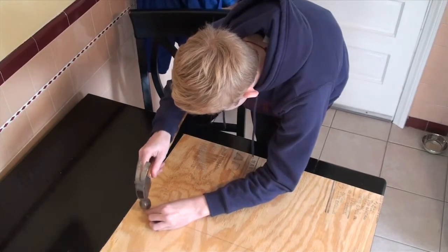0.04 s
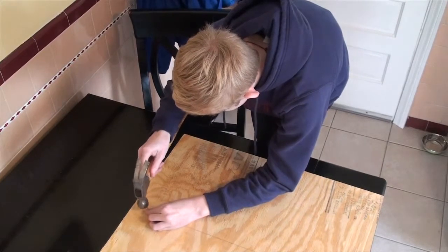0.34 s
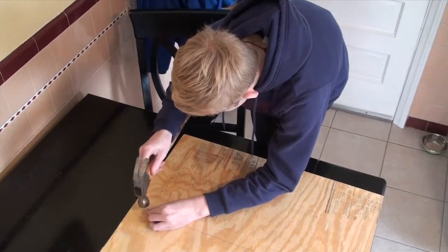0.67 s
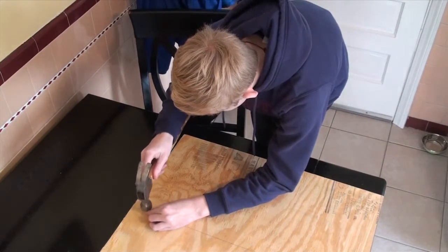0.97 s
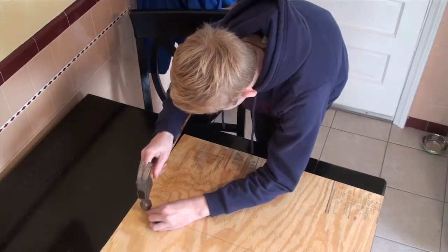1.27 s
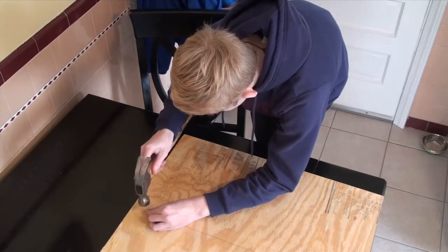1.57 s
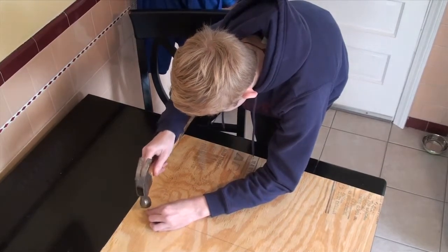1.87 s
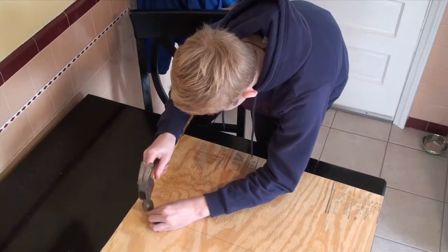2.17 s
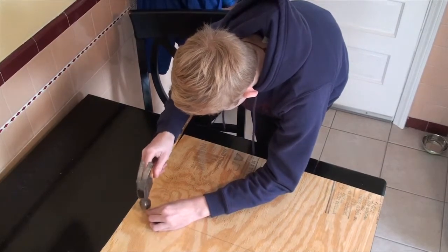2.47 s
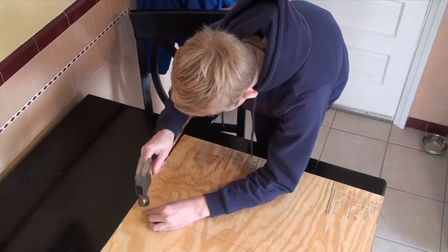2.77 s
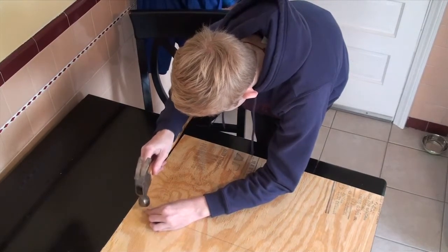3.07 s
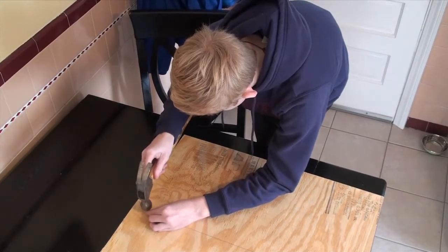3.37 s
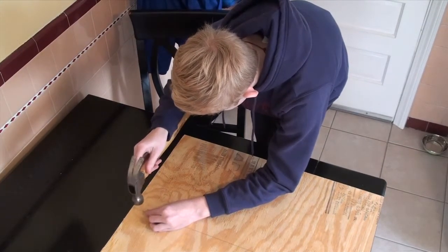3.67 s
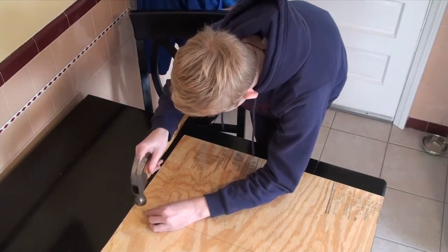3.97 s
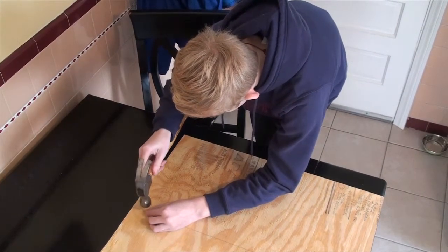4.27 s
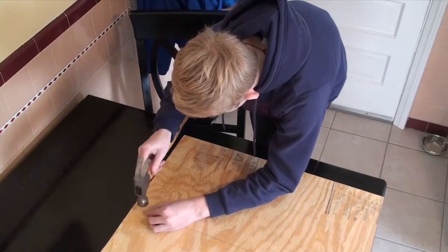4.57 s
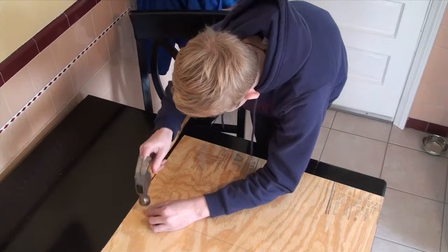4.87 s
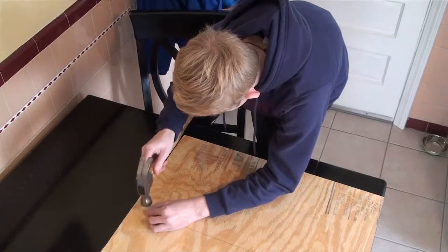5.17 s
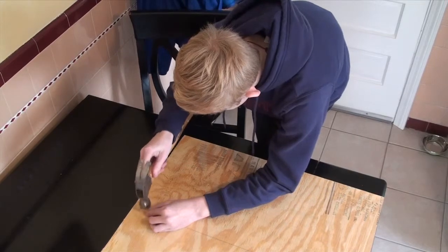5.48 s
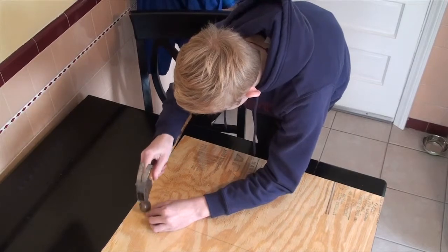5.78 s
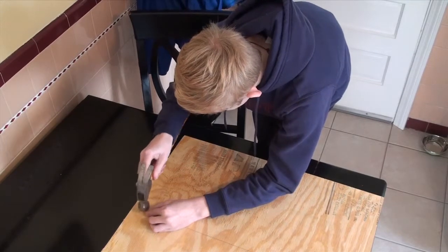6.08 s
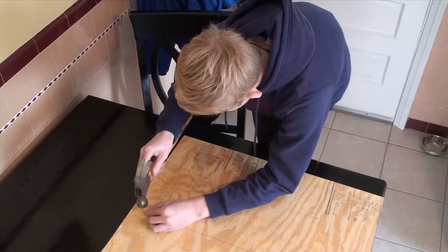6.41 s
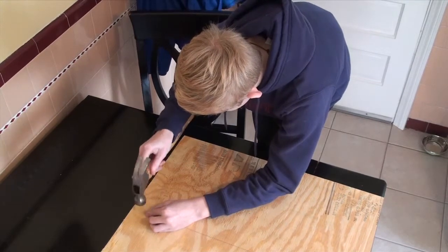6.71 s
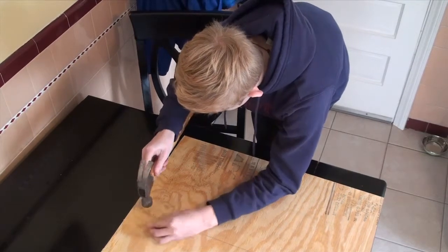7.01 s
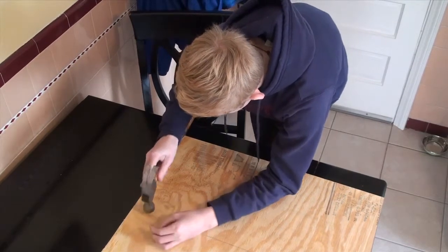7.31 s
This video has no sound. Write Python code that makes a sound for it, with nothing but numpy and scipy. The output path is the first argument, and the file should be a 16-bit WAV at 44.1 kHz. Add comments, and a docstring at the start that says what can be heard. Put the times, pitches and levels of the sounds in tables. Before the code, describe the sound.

Steady light hammer taps on a nail in a wooden board, with short pauses and a few heavier hits, over a faint indoor rumble.

```python
"""A faint appliance rumble in a small tiled room, and at once a steel hammer tapping a nail into plywood.
Fifteen light taps, a pause, nine more that grow into real blows, a second pause and one last blow. Each contact
cracks, rings the board and booms in the table under it; tiles and walls answer. Two microphones stand in the
room: the left loses the top, and on the left the boom swings opposite to the right."""
import sys
import numpy as np
from scipy import signal
from scipy.fft import rfft, irfft, next_fast_len
from scipy.io import wavfile

SR = 44100
rng = np.random.default_rng(int(sys.argv[2]) if len(sys.argv) > 2 else 0)


def generate_wav(signal):
    """Clip the signal to [-1, 1] and save it as 16-bit WAV at the path in sys.argv[1]."""
    frames = np.transpose(np.atleast_2d(signal))
    scaled = np.clip(frames, -1, 1) * 32767
    pcm = np.round(scaled).astype(np.int16)
    wavfile.write(sys.argv[1], SR, pcm)


N = 328545
AGE = np.arange(int(.7 * SR)) / SR  # time since a blow, s

# appliance rumble and hiss at the microphones: f/Hz, left/dB, right/dB
RUMBLE_SPECTRUM = [(22, -57, -49), (50, -55.5, -28), (84, -49, -29), (140, -42, -34.5), (250, -44.5, -37),
                   (353, -37, -38), (535, -39, -44.5), (870, -39, -42), (1620, -44.5, -48),
                   (3220, -51.5, -54), (6030, -57.5, -59.5), (10300, -63.5, -62.5), (13500, -79, -62.4)]
# hammer blows, bright if square, dull if off centre: t/s, strength/dB, brightness/dB, clack f/Hz
BLOWS = [(0.0948, -2.5, -1, 2600), (0.3497, -1.5, -1, 2492), (0.5845, -0.45, -1.5, 846),
         (0.8326, 0.4, -2.5, 1333), (1.0767, 0.75, -1.5, 810), (1.3185, 0.5, -1, 803),
         (1.5399, 0.9, -2.5, 801), (1.7956, 4.5, -3.5, 1041), (2.0219, 1.5, -1, 829),
         (2.2722, 0.5, -1, 806), (2.5095, 2, -2, 967), (2.7333, 2, -1.5, 1755), (2.9905, -0.2, -1.5, 2037),
         (3.2295, -1.5, -2, 1868), (3.4614, -2.5, -1, 1858), (4.5464, -9.5, -5, 1078),
         (4.8234, -1, -0.5, 1126), (5.0782, 0.3, -3.5, 916), (5.3319, -0.75, -4, 1049),
         (5.5997, -2.5, -1.5, 1246), (5.8636, 5.5, 1.5, 2813), (6.1222, 9, 0, 1436), (6.3836, 9.5, 3, 1815),
         (6.6663, 7, -7, 1061), (7.4176, 11, -4, 998)]
# quickly damped modes of the wood around the nail: f/Hz, level/dB, t60/s
CRACK_MODES = [(910, -15, 0.0069), (1397, -16, 0.0081), (1690, -23, 0.007), (3290, -29.5, 0.0053),
               (8230, -36, 0.019), (10800, -14, 0.0019)]
# hard surfaces close to the nail: delay/s, left/dB, right/dB
NEAR_PATHS = [(.0023, -52, -12.5), (.0034, -34, -6.5)]
# colour of the crack as it leaves the board: f/Hz, level/dB
CRACK_RESPONSE = [(400, -2.5), (590, -10), (800, 3.5), (4200, -2.5), (5200, -6), (6500, 1)]
# lasting modes of the board: f/Hz, level/dB, t60/s
BOARD_MODES = [(337, -51, 0.37), (377, -47.5, 0.41), (414, -41.5, 0.72), (462, -37.5, 0.6),
               (532.7, -41.5, 0.51), (833, -37.5, 0.082), (893, -41.5, 0.42), (964.4, -37, 0.28),
               (1159, -37, 0.22), (1446, -43, 0.39), (1792, -43.5, 0.37), (1960, -39.5, 0.37),
               (2123, -46.5, 0.37), (2530, -36.5, 0.18), (3500, -61, 0.2), (4195, -41.5, 0.32)]
# diffuse sound of one tap in the room: f/Hz, left/dB, right/dB
ROOM_SPECTRUM = [(60, 25, -0.5), (184, 24.5, 22.5), (302, 17.5, 18), (430, 14, 21.5), (620, 15, 16),
                 (864, 4, 19), (1150, 7, 12), (1730, 2.5, 10), (2440, 3.5, 12), (3640, 2, 8.5),
                 (5260, -2.5, 6), (7600, -2.5, 4.5), (11300, -3.5, -1.5), (16200, -8, -18)]
# low modes of board and table together: f/Hz, left/dB, right/dB, t60/s
TABLE_MODES = [(50.55, -39, -25.5, 0.74), (51.4, -16.5, -16, 0.35), (88.5, -22.5, -21.5, 0.21),
               (105, -29.5, -29.5, 0.3), (129.3, -32.5, -20.5, 0.29), (154.7, -18.5, -22, 0.35),
               (172.6, -24, -26.5, 0.45), (232.5, -30.5, -25, 0.35), (257, -26, -22, 0.2),
               (257, -28, -26.5, 0.332)]
# the boom's ways to the microphones, straight and off the walls: delay/s, left/dB, right/dB
TABLE_PATHS = [(0.0039, 1.5, 5.5), (0.0145, -0.4, 2.5), (0.0315, -1.5, 1.5), (0.042, -2, 3.5),
               (0.064, -22, -15.5)]
# standing waves between the walls: f/Hz, level/dB, t60/s
ROOM_MODES = [(91.8, -29, 1), (104.35, -25, 0.82)]
# how board and table pass on the thump: f/Hz, level/dB
THUMP_RESPONSE = [(120, 0.5), (155, -4), (240, -1.5), (300, -1)]
# hollow notes of the board round a seated nail: f/Hz, level/dB, t60/s
KNOCK_MODES = [(282, -40, 0.047), (427, -19, 0.15)]
# treble loss of the left microphone: f/Hz, level/dB
LEFT_MIC_RESPONSE = [(11000, -0.5), (12400, -5), (16000, -38)]


def undb(db):
    """Decibels to gain."""
    return 10 ** (np.asarray(db) / 20)


def tint(x, hz, db):
    """Minimum-phase filter through points of f/Hz, level/dB."""
    size = 2 * next_fast_len(x.shape[-1])
    freq = np.maximum(np.fft.rfftfreq(size, 1 / SR), 1)
    cepstrum = irfft(np.interp(np.log(freq), np.log(hz), np.log(undb(db))))
    cepstrum[1:size // 2] *= 2
    cepstrum[size // 2 + 1:] = 0
    return irfft(rfft(x, size) * np.exp(rfft(cepstrum)))[..., :x.shape[-1]]


def tint_pair(pair, table):
    """Colours each side by rows of f/Hz, left/dB, right/dB."""
    hz, *sides = np.transpose(table)
    return np.array([tint(x, hz, db) for x, db in zip(pair, sides)])


def noise_pair(size, shared=0.21):
    """Noise at two microphones, partly the same in both."""
    left, right, both = rng.standard_normal((3, size))
    return np.sqrt(1 - shared) * np.array([left, right]) + np.sqrt(shared) * both


def fade(t60):
    """Decay of 60 dB in t60 seconds."""
    return np.exp(-np.log(1000) * AGE / t60)


def swell(rise_s):
    """Rise from silence with time constant rise_s."""
    return 1 - np.exp(-AGE / rise_s)


def modes(table):
    """Struck modes; neighbours swing in opposite directions."""
    return sum((-1) ** k * undb(db) * np.sin(2 * np.pi * hz * AGE) * fade(t60)
               for k, (hz, db, t60) in enumerate(table))


def delayed(x, delay_s):
    """The same sound, arriving later."""
    return np.interp(AGE - delay_s, AGE, x, left=0)


def echoes(pair, paths):
    """Delayed copies of a sound at the two microphones."""
    return sum(undb([[left_db], [right_db]]) * np.array([delayed(x, delay_s) for x in pair])
               for delay_s, left_db, right_db in paths)


def appliance_rumble(dip_db=-5, dip_s=(6.8, 7.9)):
    """Room tone: rumble and hiss, which sink a little towards the end."""
    level_db = np.interp(np.arange(N) / SR, dip_s, [0, dip_db])
    return tint_pair(noise_pair(N), RUMBLE_SPECTRUM) * undb(level_db)


def nail_crack(left_db=-4, snap_db=-22, snap_t60=0.025, radiate_hz=720):
    """The wood dips under the nail and the fibres snap; nearby surfaces repeat it at once."""
    snap = tint(noise_pair(len(AGE)), [600, 2500, 10000, 15000], [18.5, 5.0, 5.5, -14.5])
    snap *= undb(snap_db) * fade(snap_t60)
    # right under the nail all modes start together, and so small a patch radiates no bass
    patch = sum(modes([row]) for row in CRACK_MODES)
    wood = signal.sosfilt(signal.butter(2, radiate_hz, "high", fs=SR, output="sos"), patch)
    direct = undb([[left_db], [0]]) * (wood + snap)
    return tint(direct + echoes([wood, wood], NEAR_PATHS), *np.transpose(CRACK_RESPONSE))


def board_ring(left_db=-7, rise_s=0.0013):
    """Bending waves spread over the board and ring on."""
    return undb([[left_db], [0]]) * modes(BOARD_MODES) * swell(rise_s)


def room_tail(t60=0.39, treble_t60=0.23, split_hz=5500, rise_s=0.005):
    """Dense reflections off tiles and walls; the treble dies first."""
    noise = noise_pair(len(AGE))
    low = signal.sosfilt(signal.butter(1, split_hz, fs=SR, output="sos"), noise)
    tail = (low * fade(t60) + (noise - low) * fade(treble_t60)) * swell(rise_s)
    energy = np.sum(tail ** 2, axis=1, keepdims=True)
    return tint_pair(tail / np.sqrt(energy), ROOM_SPECTRUM)


def wall_slap(level_db=-5, left_db=-9, delay_s=0.0025, t60=0.0062, band_hz=(2280, 4000)):
    """A short, bright slap of the crack off the wall beside the table."""
    band = signal.butter(3, band_hz, "band", fs=SR, output="sos")
    slap = signal.sosfilt(band, noise_pair(len(AGE)) * fade(t60))
    return undb(level_db) * echoes(slap, [(delay_s, left_db, 0)])


def table_boom(soft_hz=700, hum_left_db=-9, hum_rise_s=0.062, left_lag_s=0.00046):
    """Board and table heave and the room hums after; on the left side the boom arrives late and inverted."""
    hz, *sides, t60 = np.transpose(TABLE_MODES)
    heave = [modes(zip(hz, db, t60)) for db in sides]
    heave = signal.sosfilt(signal.butter(2, soft_hz, fs=SR, output="sos"), heave)
    hum = undb([[hum_left_db], [0]]) * modes(ROOM_MODES) * swell(hum_rise_s)
    left, right = echoes(heave, TABLE_PATHS) + hum
    return np.array([-delayed(left, left_lag_s), right])


def board_rebound(hz=243, level_db=-22, t60=0.14, delay_s=0.046, left_db=-12, rise_s=0.0047):
    """The board springs back on the table and answers with a low hollow note."""
    note = modes([(hz, level_db, t60)]) * swell(rise_s)
    return echoes([note, note], [(delay_s, left_db, 0)])


def seated_knock(left_db=-9, rise_s=0.0096):
    """Hollow notes of the board once the nail is firmly seated."""
    return undb([[left_db], [0]]) * modes(KNOCK_MODES) * swell(rise_s)


def contact_levels(count, strength_db, bright_db, sink_above_db=4, bite_blows=3.8, grip_blows=16.4):
    """Gains in dB for the crack and four bands of a blow, as the nail bites, is gripped and sinks."""
    unbitten, loose = np.exp(-count / bite_blows), np.exp(-count / grip_blows)
    # under a hard blow the nail sinks and cushions the contact
    excess_db = max(strength_db - sink_above_db, 0)
    crack_db = 1.93 - 0.54 * excess_db
    top_db = -2.03 - 1.44 * excess_db + bright_db
    # the boom grows more slowly than the blow, and is fullest after a square hit on a firm nail
    boom_db = 2.1 - 0.54 * excess_db - 0.83 * strength_db + 0.39 * bright_db - 2 * loose
    # the board springs back fully only once the point has bitten
    rebound_db = 2 - 1.33 * excess_db - 0.11 * strength_db - 7.5 * unbitten
    # the tighter the wood grips the shank, the more the board knocks
    knock_db = 6.6 - 1.4 * excess_db - 12 * loose
    return crack_db, boom_db, rebound_db, knock_db, top_db


def clack(blow, hz, strength_db, q=6):
    """The nail stands a little differently each time and favours another narrow band of the board."""
    lift_db = 3.5 + 0.24 * strength_db
    band = signal.lfilter(*signal.iirpeak(hz, q, fs=SR), blow)
    return blow + (undb(lift_db) - 1) * band


def hammering(seating_s=(5.0, 5.9), fresh_share=0.31):
    """Every blow drives the same board and room; the contact sets its weight, brightness and clack."""
    track = np.zeros((2, N))
    crack, ring, room, knock = nail_crack(), board_ring(), room_tail(), seated_knock()
    table = tint(table_boom() + board_rebound(), *np.transpose(THUMP_RESPONSE))
    for count, (at_s, strength_db, bright_db, clack_hz) in enumerate(BLOWS):
        crack_db, boom_db, rebound_db, knock_db, top_db = contact_levels(count, strength_db, bright_db)
        treble_db = 2.1 + 0.71 * bright_db
        # part of the room's answer changes as the hammer lands differently
        tail = np.sqrt(1 - fresh_share) * room + np.sqrt(fresh_share) * room_tail()
        blow = undb(crack_db) * (crack + wall_slap()) + ring + tail
        colour_db = [rebound_db, knock_db, 0, 0, treble_db, top_db]
        blow = tint(blow, [200, 410, 680, 2200, 4000, 9000], colour_db)
        blow = clack(blow, clack_hz, strength_db)
        thump = tint(table, [125, 230], [boom_db, rebound_db])
        seated = np.interp(at_s, seating_s, [0, 1])
        sound = undb(strength_db) * (blow + seated * knock + thump)
        start = int(at_s * SR)
        track[:, start:start + len(AGE)] += sound[:, :N - start]
    return track


def scene():
    """Hammering at two unlike microphones, over the room tone."""
    left, right = hammering()
    left = tint(left, *np.transpose(LEFT_MIC_RESPONSE))
    return np.array([left, right]) + appliance_rumble()


def record(dry, top_hz=16000):
    """The recorder rounds peaks near full scale and cuts the top."""
    rounded = dry / (1 + dry ** 4) ** (1 / 4)
    return signal.sosfilt(signal.ellip(8, .2, 70, top_hz, fs=SR, output="sos"), rounded)


dry = scene()
out = record(dry)
generate_wav(out)
```